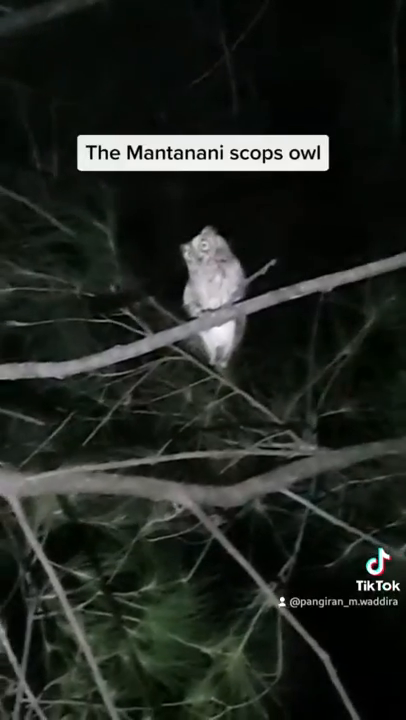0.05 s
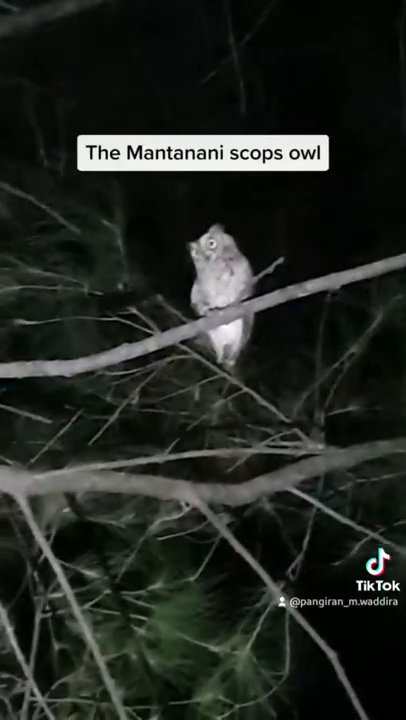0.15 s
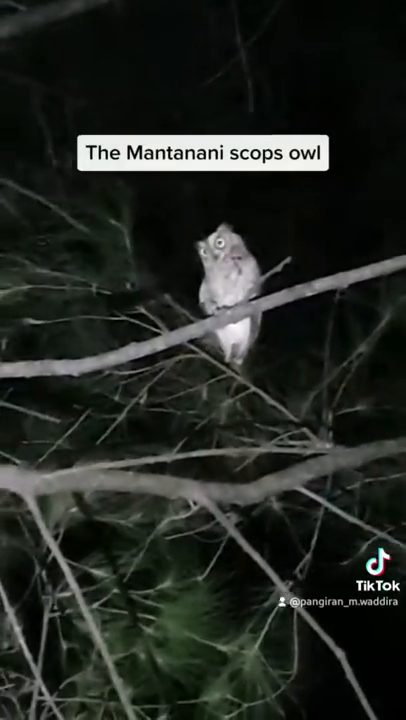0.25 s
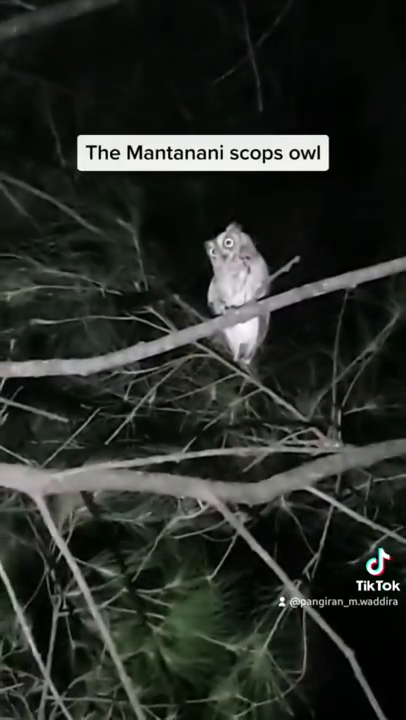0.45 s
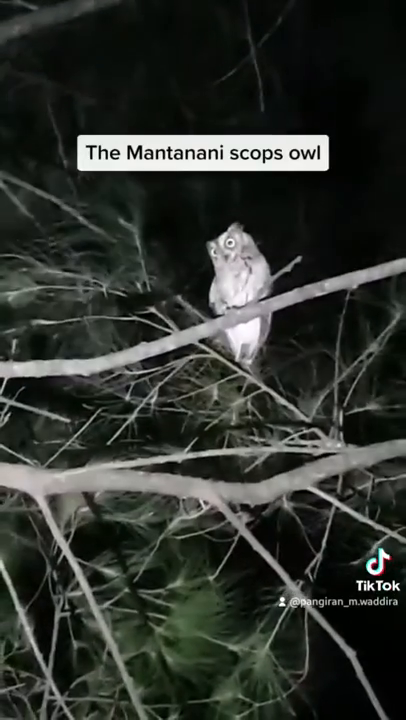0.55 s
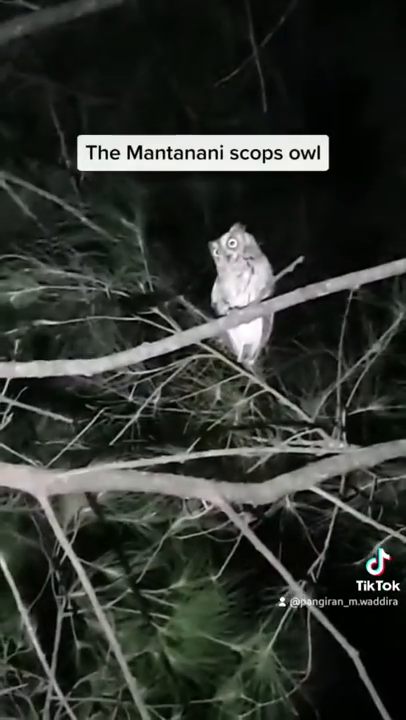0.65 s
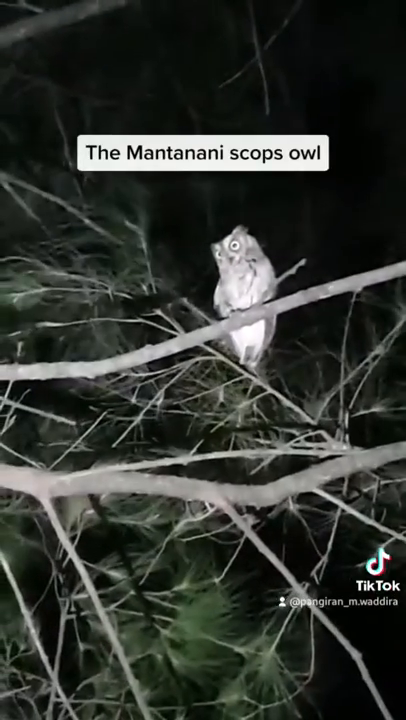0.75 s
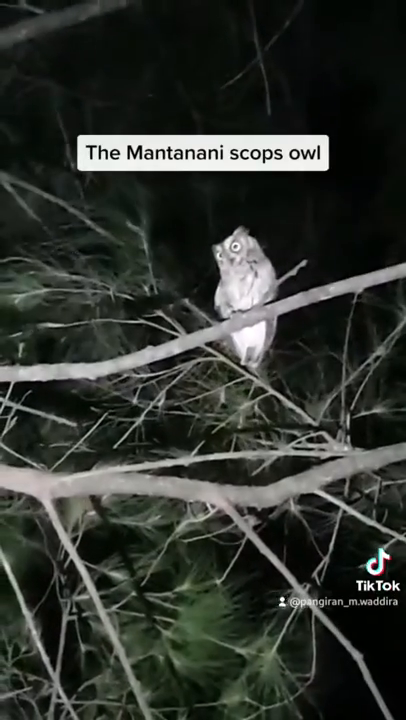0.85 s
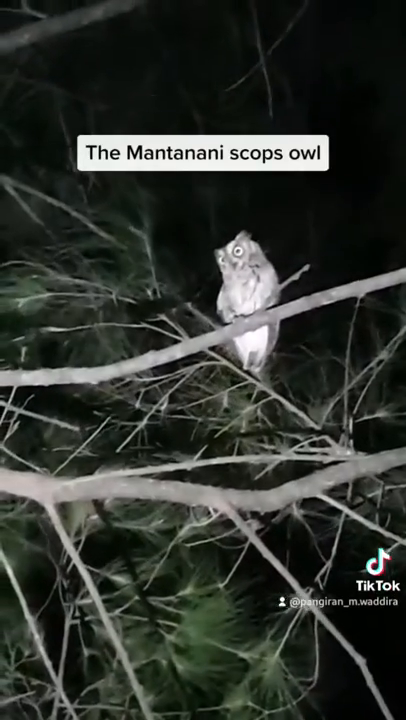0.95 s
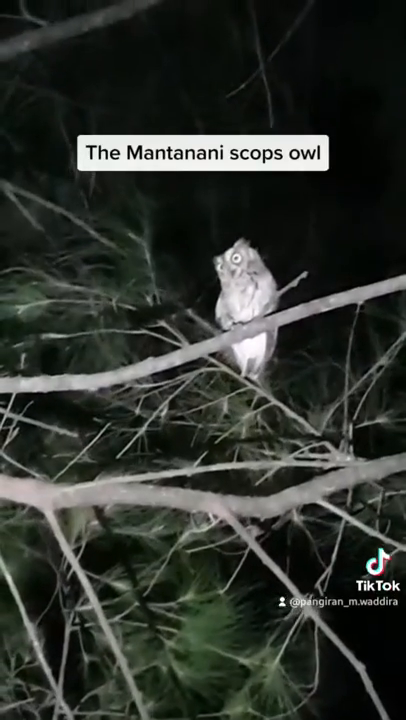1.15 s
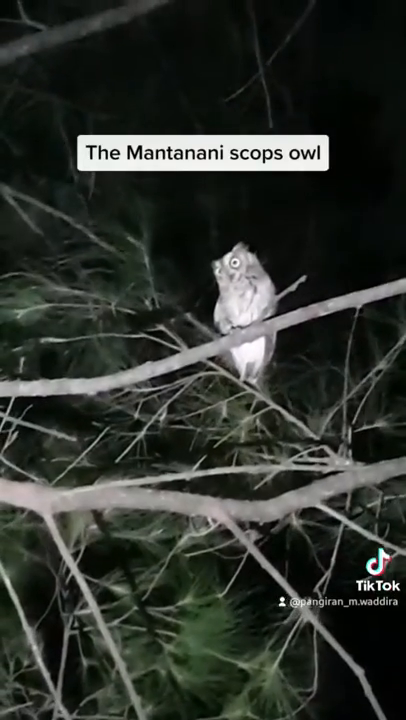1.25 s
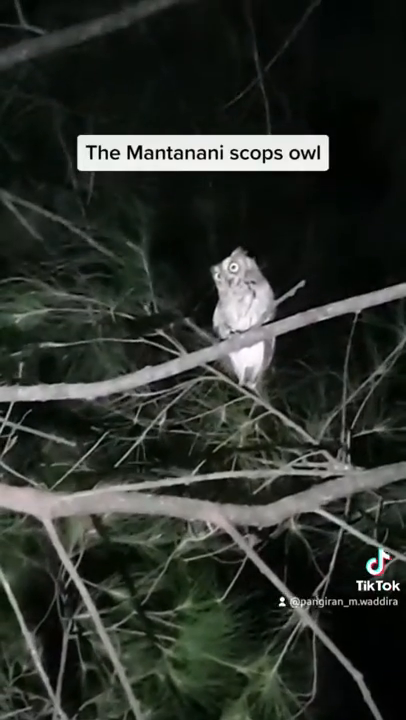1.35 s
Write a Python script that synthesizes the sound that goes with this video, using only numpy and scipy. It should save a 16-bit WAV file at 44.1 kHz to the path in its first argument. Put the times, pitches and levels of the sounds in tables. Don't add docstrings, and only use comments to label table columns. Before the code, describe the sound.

Night woodland in stereo: crickets and faint high katydid ticking come first, then a single smooth owl hoot with woody echo. Light drips, fluttering moth puffs and tiny snaps sit close by, ending with a dry leaf scrape.

```python
import sys
import numpy as np
from scipy import signal
from scipy.fft import rfft, irfft, next_fast_len
from scipy.io import wavfile
from scipy.ndimage import uniform_filter1d, map_coordinates

SR = 44100
rng = np.random.default_rng(int(sys.argv[2]) if len(sys.argv) > 2 else 0)


def boost(x):
    u = np.asarray(x, float) / 20
    return 10 ** u


def digitize_waveform(pressure):
    field = np.atleast_2d(pressure).T
    bounded = np.clip(field, -1, 1)
    quanta = np.round(bounded * 32767).astype(np.int16)
    wavfile.write(sys.argv[1], SR, quanta)


N = 61739

# f/Hz, level/dB per Hz
AIR_SPECTRUM = [(15, -32), (30, -6), (55, 1.5), (130, -7), (400, -10.5), (1700, -12.5), (3200, -14.5),
                (15600, -24)]
# f/Hz, likeness/0-1
AIR_LIKENESS = [(30, 0.68), (180, 0.49), (550, 0.73), (1650, 0.39), (5000, 0.12), (15000, 0.18)]
# f/Hz, level/dB
LEAF_COLOUR = [(300, -7), (900, 6), (2000, 3), (4000, -2.5), (9000, -9), (15000, -11)]
# t/s, peak level/dB, T60/s
SCUFFS = [
    (.432, -27, 0.091),
    (.885, -24.5, 0.12),
    (1.3595, -15.5, .02),
    (1.366, -24.5, 0.062),
    (1.391, -18.5, 0.062),
]
# f/Hz, level/dB
TWIG_COLOUR = [(2500, -30), (3600, -3), (6000, 0), (9000, -2), (11500, -10), (15000, -11)]
# t/s, peak level/dB, T60/s
CRACKS = [
    (.4254, -29, .008),
    (.5745, -30, 0.023),
    (.639, -29, 0.017),
    (.7675, -29, .015),
    (.801, -29, 0.016),
    (.8744, -33.5, 0.026),
    (.922, -30, 0.021),
    (1.1765, -21.5, 0.011),
]
# t/s of first pulse, level/dB, first pulse relative level/dB
FAR_CHIRPS = [
    (.033, -33, -2),
    (.365, -34, -2),
    (.705, -34, -2),
    (1.04, -33, -2),
]
# t/s of first pulse, level/dB, first pulse relative level/dB
NEAR_CHIRPS = [
    (.2815, -22.5, -12),
    (.665, -22.5, -25),
    (1.005, -24, -2),
    (1.382, -22, -3),
]
# start t/s, end t/s, level/dB
KATYDID_RUNS = [
    (.0075, .52, -35.5),
    (0.598, .61, -34),
    (0.666, .86, -36.5),
    (0.933, 1.21, -36),
    (1.292, 1.32, -34.5),
]
# f/Hz, level/dB
KATYDID_COLOUR = [(9000, -41), (10700, -2), (11300, -3), (12200, -5.5), (13600, 5), (14400, -4),
                  (15200, -22)]
# t/s, peak level/dB, f/Hz, fall of pitch/0-1
DRIPS = [
    (0.3363, -20.5, 2000, 0.57),
    (.3655, -38, 2230, 0.1),
    (0.4265, -14.5, 1720, .25),
    (0.4612, -28, 1680, 0.25),
    (0.5613, -20.5, 1680, 0.04),
    (0.8753, -22.5, 2300, 0.25),
    (0.896, -26.5, 1480, 0.87),
    (.9633, -34, 2090, 0.44),
    (1.284, -28, 2170, 0.58),
]
# start t/s, end t/s, beat gap/s, level/dB
MOTH_BOUTS = [
    (0.272, .31, 0.033, -23),
    (0.444, .5, 0.019, -21),
    (0.538, .57, 0.0109, -27.5),
    (0.584, .645, .0178, -24.5),
    (0.753, .84, .014, -24),
    (.86, .89, 0.01, -32.5),
]
# t/s, f/Hz, level/dB
HOOT = [
    (.1869, 700.18, -37),
    (.2078, 756.28, -20.6),
    (.2878, 813.98, -10.6),
    (.3589, 809.87, -14.2),
    (.3916, 809.55, -9.2),
    (.4193, 810.88, -15.4),
    (.6971, 725.83, -21),
    (.9121, 632.2, -39.8),
    (.95, 605.72, -47),
]
# delay/s, level/dB re direct
ECHOES = [
    (0.04882, -14.1),
    (0.07925, -19.8),
    (0.098, 4.9),
    (0.11436, -15.7),
    (0.1259, -13.5),
    (0.13397, -18.1),
    (0.17816, -22.3),
    (0.18693, -13.7),
    (0.19738, -18.7),
    (0.2639, -22.9),
]


def unit(x):
    return x / np.sqrt(np.mean(x ** 2) + 1e-20)


def along(points, hz):
    f, v = np.transpose(points)
    return np.interp(np.log(hz + 1), np.log(f + 1), v, v[0], v[-1])


def wobble(rate):
    knots = rng.standard_normal(int(N * rate / SR) + 4)
    return map_coordinates(knots, [np.arange(N) * rate / SR])


def filtered(x, response):
    m = next_fast_len(N + SR)
    return irfft(rfft(x, m) * response(np.fft.rfftfreq(m, 1 / SR)), m)[..., :N]


def add(track, s, sound, pan_db):
    part = track[:, max(round(s * SR), 0):][:, :len(sound)]
    part += boost([[pan_db / 2], [-pan_db / 2]]) * sound[:part.shape[1]]


def bursts(rows, colour, gain_db, snap=0):
    out, t = np.zeros((2, N)), np.arange(SR // 10) / SR
    tint = lambda f: boost(along(colour, f))
    grit = unit(filtered(rng.standard_normal(N), tint))
    front = filtered(1. * (np.arange(N) == 20), tint)[:len(t)]
    for s, db, t60 in rows:
        puff = boost(-60 * t / t60) * np.roll(grit, -round(s * SR))[:len(t)]
        puff = puff / np.linalg.norm(puff) * np.sqrt(t60 * SR / 14)
        puff = puff + snap * front / front.max()
        add(out, s, boost(db + gain_db) * puff, -1)
    return out


def night_air():
    z = signal.stft(rng.standard_normal((2, N)), nperseg=512)[2]
    patches = uniform_filter1d(rng.standard_normal(z.shape[1:]), 30, 0)
    patches = uniform_filter1d(patches, 5, 1)
    pair = signal.istft(z * boost(1.77 * unit(patches)), nperseg=512)[1][:, :N]
    turn = lambda hz: np.arccos(np.clip(along(AIR_LIKENESS, hz), 0, 1)) / 2
    shape = lambda hz: boost(along(AIR_SPECTRUM, hz)) * [np.cos(turn(hz)), np.sin(turn(hz))]
    mid, side = filtered(pair, shape)
    return boost(-32) * unit(np.array([mid + side, mid - side])) * boost([[-.5], [.5]])


def far_hum():
    level = boost(-44 + 3.2 * wobble(8.6))
    return level * np.sin(2 * np.pi * np.cumsum(98 + 2 * wobble(9.17)) / SR)


def rustles():
    per_s, level_db = 210, -45.5 + 20.5
    chance, size = rng.random(N), rng.standard_normal((2, N))
    specks = (chance < per_s / SR) * (size[0] + 0.25 * size)
    return boost(level_db) * filtered(specks, lambda f: boost(along(LEAF_COLOUR, f)))


def cricket_chorus():
    centre_hz, wide_hz, level_db = 3773, 282, -44
    band = filtered(rng.standard_normal((2, N)), lambda f: np.exp(-((f - centre_hz) / wide_hz) ** 2))
    band = unit(band + 0.67 * band[::-1])
    return boost(level_db + 2 * wobble(80)) * band


def crickets():
    gap_s, gap_grows_s, pulse_s = .013, .00055, .0075
    stroke_hz, fall_hz = 4850, 150
    out = np.zeros((2, N))
    for chirps, pan_db in ((NEAR_CHIRPS, -.5), (FAR_CHIRPS, -2)):
        for s, db, first_db in chirps:
            for k, (late, size, tune) in enumerate(rng.standard_normal((8, 3))):
                long = pulse_s * (.85 + .05 * k)
                u = np.arange(round(long * SR)) / SR / long
                turns = long * ((stroke_hz + 35 * tune) * u - fall_hz * u ** 3)
                stroke = np.sin(np.pi * u ** 1.6) ** .7 * np.sin(2 * np.pi * turns)
                at = s + gap_s * k + gap_grows_s * k * (k - 1) / 2 + .0005 * late
                at -= .65 * long
                level_db = db + 1.3 * size + first_db * (k == 0)
                add(out, at, boost(level_db) * stroke, pan_db)
    reflected = 0
    for delay_s, db in ((.007, -14), (.016, -20)):
        late_copy = np.roll(out, round(delay_s * SR), axis=1)
        reflected = reflected + boost(db) * late_copy * (np.arange(N) > SR // 10)
    return out + reflected


def katydid():
    tick_gap_s, tick_t60_s = .0265, .017
    rows = []
    for start, end, db in KATYDID_RUNS:
        for s in np.arange(start, end, tick_gap_s):
            rows.append((s, db + 1.4 * rng.standard_normal(), tick_t60_s))
    return bursts(rows, KATYDID_COLOUR, gain_db=2)


def leaf_scuffs():
    return bursts(SCUFFS, LEAF_COLOUR, gain_db=-4)


def twig_cracks():
    return bursts(CRACKS, TWIG_COLOUR, gain_db=-1, snap=4.8)


def drips():
    t60_s, attack_s, glide_s = 0.0087, 0.00032, .0015
    out, t = np.zeros((2, N)), np.arange(SR // 50) / SR
    for s, db, hz, fall in DRIPS:
        turns = hz * (t + fall * glide_s * (1 - np.exp(-t / glide_s)) * 2 - fall * t)
        swell = boost(db - 0.5 - 60 * t / t60_s) * (1 - np.exp(-t / attack_s))
        add(out, s, swell * 3 * np.sin(2 * np.pi * turns), -1)
    return out


def moth():
    beat_s = 0.00065
    out, u = np.zeros((2, N)), np.linspace(-6, 6, round(12 * beat_s * SR))
    puff = np.exp(-u ** 2) - 0.1 * np.exp(-((u - 1) / 3) ** 2)
    for start, end, gap, db in MOTH_BOUTS:
        for s in np.arange(start, end, gap):
            add(out, s - 6 * beat_s, boost(db + 1 + 2 * rng.standard_normal()) * puff, 0)
    return out


def hoot():
    s, hz, db = np.transpose(HOOT)
    t = np.arange(N) / SR
    bend = np.linalg.solve(abs(s[:, None] - s) ** 3, hz)
    pitch = abs(np.clip(t, s[0], s[-1])[:, None] - s) ** 3 @ bend
    phase = 2 * np.pi * np.cumsum(pitch) / SR
    quaver_db = 1.1 * wobble(90)
    level = np.sqrt(2) * boost(np.interp(t, s, db, -99, -99) + quaver_db)
    return level * (np.sin(phase) + boost(-52) * np.sin(2 * phase))


def owl():
    wood_db, wood_side_db, wood_t60_s, wood_from_s = -21, -14, 1.4, .27
    t = np.arange(N) / SR
    tone = hoot()
    paths = lambda f: 1 + sum(boost(g) * np.exp(-2j * np.pi * f * d) for d, g in ECHOES)
    heard = filtered(tone, paths)
    tail = rng.standard_normal((2, N)) * boost(-60 * t / wood_t60_s) * (t > wood_from_s)
    answer = signal.fftconvolve(tone[None], tail / np.linalg.norm(tail[0]), axes=1)[:, :N]
    mid, side = answer * boost([[wood_db], [wood_db + wood_side_db]])
    return heard + np.array([mid + side, mid - side])


def scene():
    background = night_air() + far_hum() + rustles() + cricket_chorus()
    insects = crickets() + katydid() + moth()
    litter = leaf_scuffs() + twig_cracks() + drips()
    return background + insects + litter + owl()


def low_pass(x):
    return signal.sosfilt(signal.butter(12, 15740, fs=SR, output="sos"), x)


def record(dry):
    top_hz, offset = 15400, .0206
    mix = filtered(dry, lambda f: f < top_hz) + offset
    return low_pass(mix)


dry = scene()
out = record(dry)
digitize_waveform(out)
```